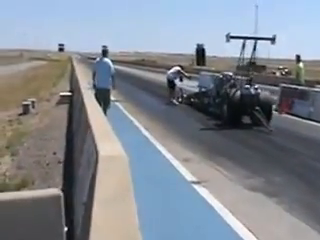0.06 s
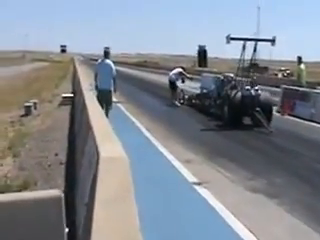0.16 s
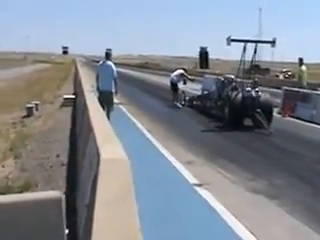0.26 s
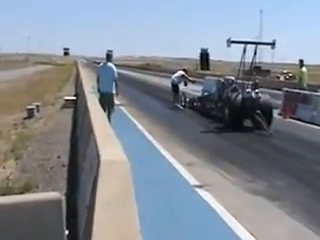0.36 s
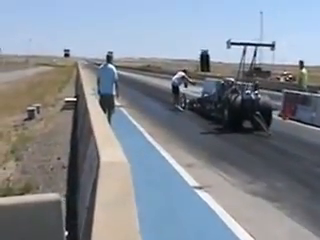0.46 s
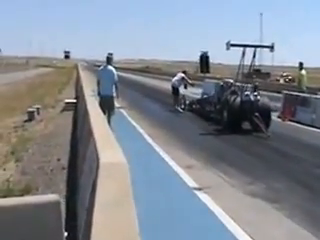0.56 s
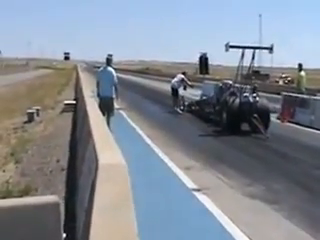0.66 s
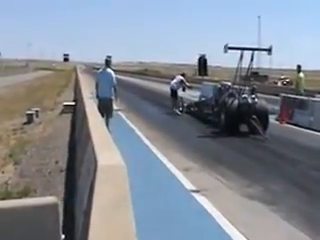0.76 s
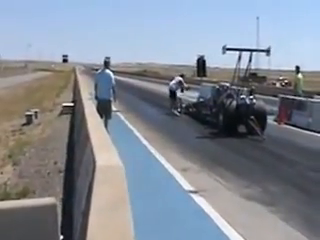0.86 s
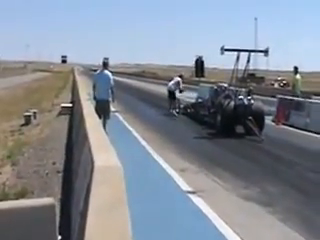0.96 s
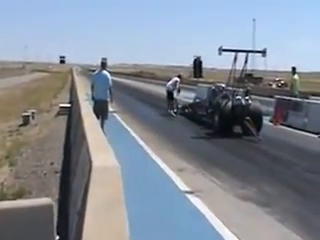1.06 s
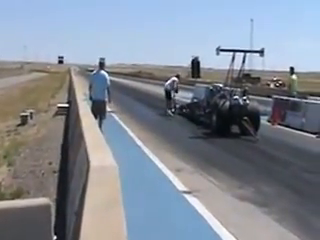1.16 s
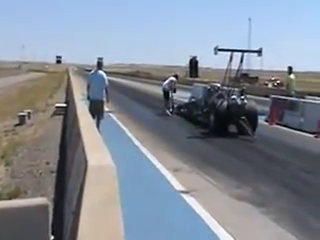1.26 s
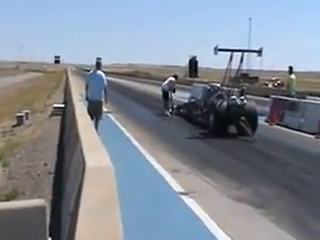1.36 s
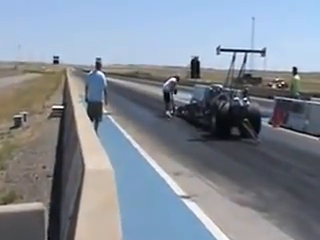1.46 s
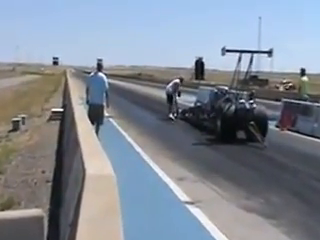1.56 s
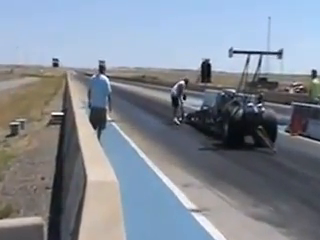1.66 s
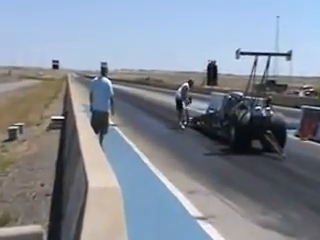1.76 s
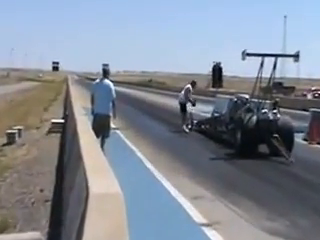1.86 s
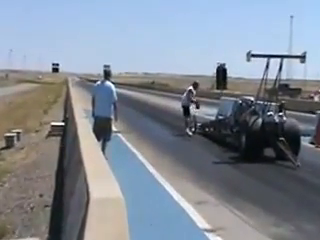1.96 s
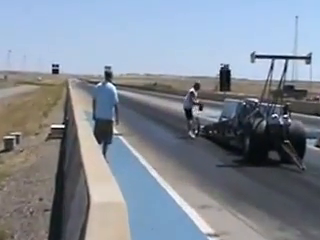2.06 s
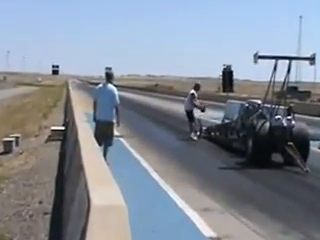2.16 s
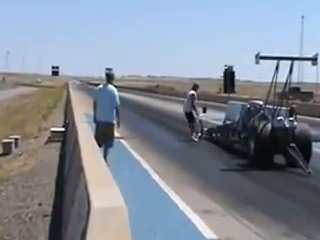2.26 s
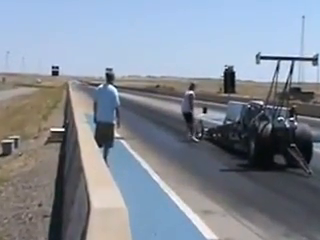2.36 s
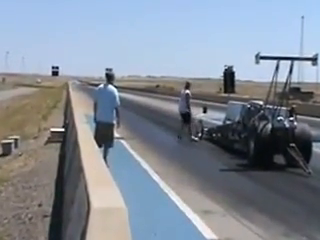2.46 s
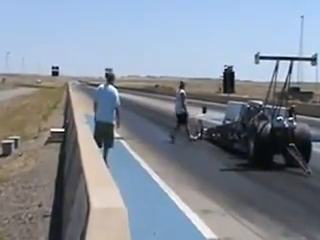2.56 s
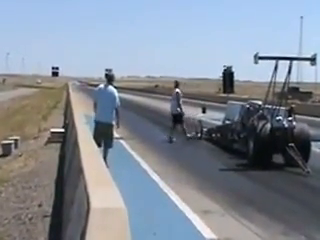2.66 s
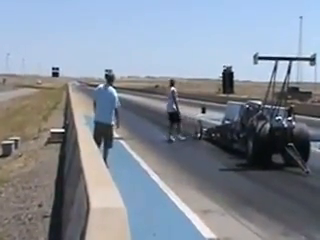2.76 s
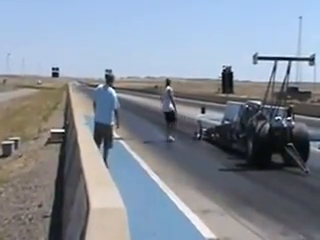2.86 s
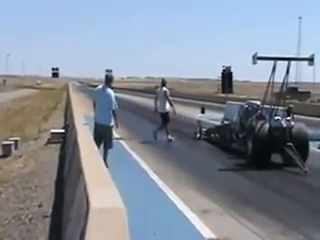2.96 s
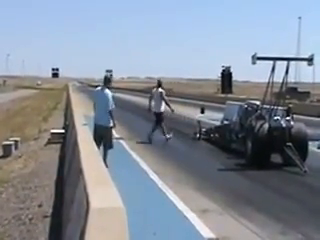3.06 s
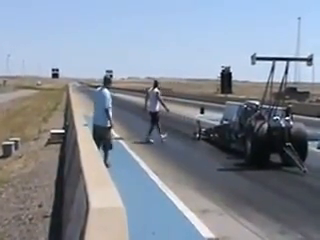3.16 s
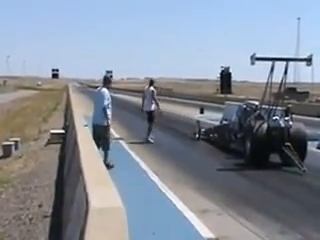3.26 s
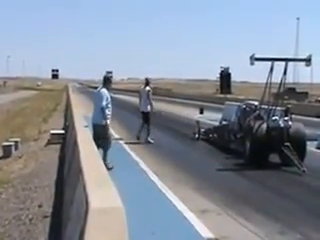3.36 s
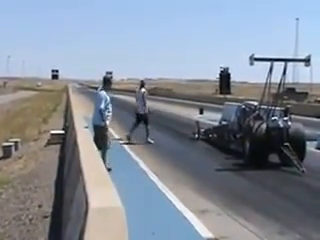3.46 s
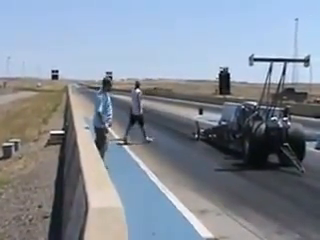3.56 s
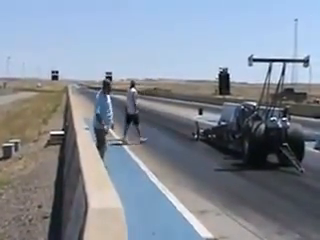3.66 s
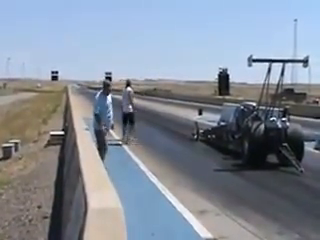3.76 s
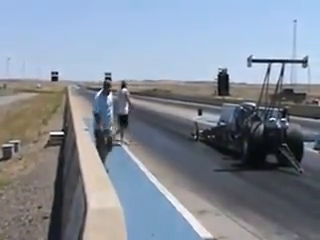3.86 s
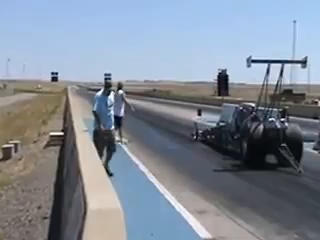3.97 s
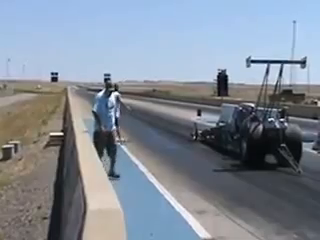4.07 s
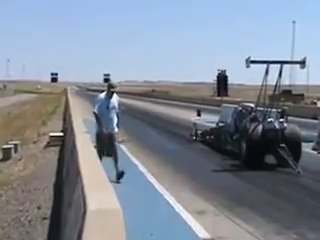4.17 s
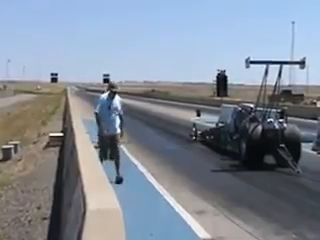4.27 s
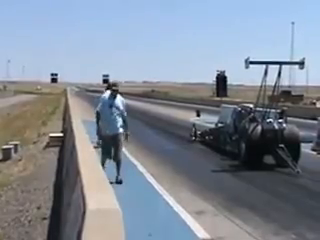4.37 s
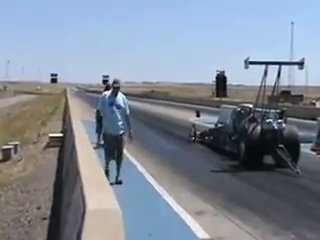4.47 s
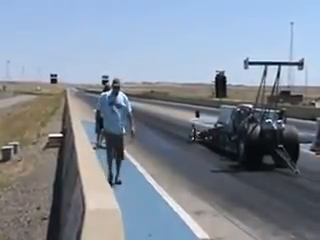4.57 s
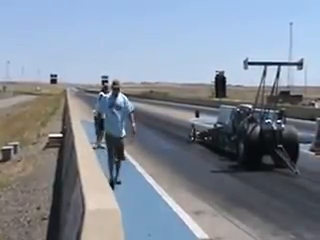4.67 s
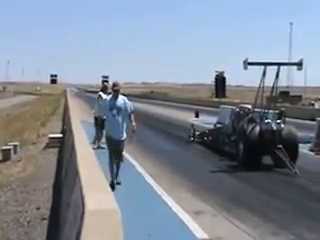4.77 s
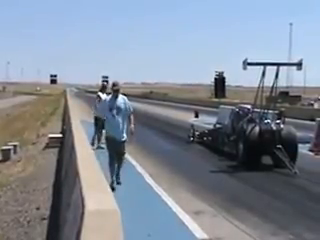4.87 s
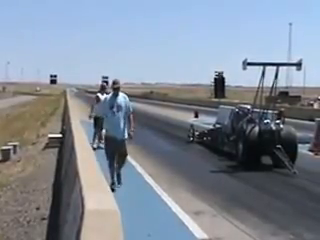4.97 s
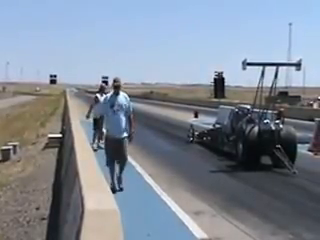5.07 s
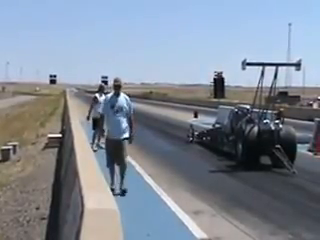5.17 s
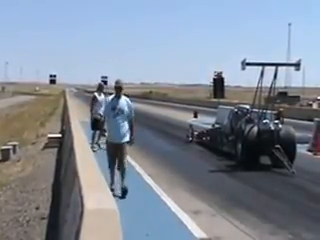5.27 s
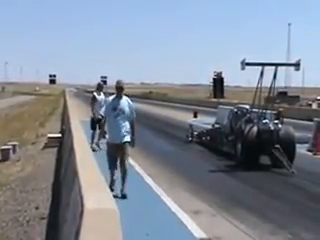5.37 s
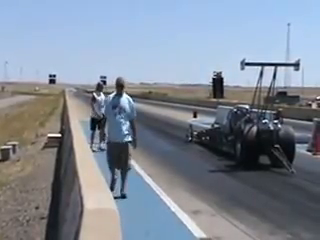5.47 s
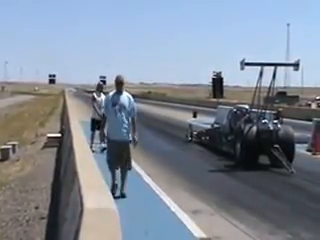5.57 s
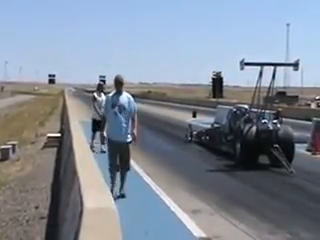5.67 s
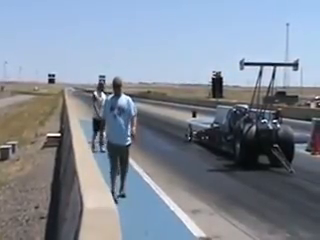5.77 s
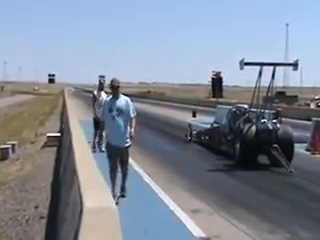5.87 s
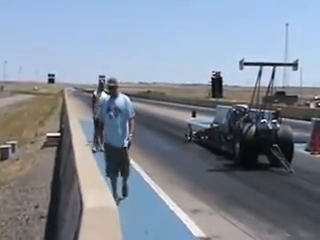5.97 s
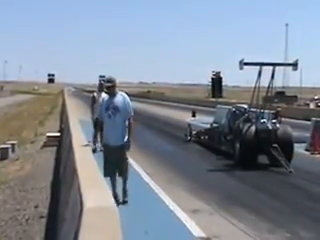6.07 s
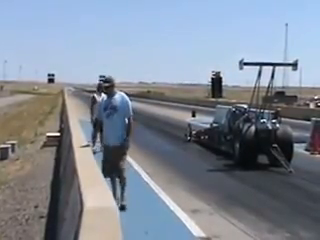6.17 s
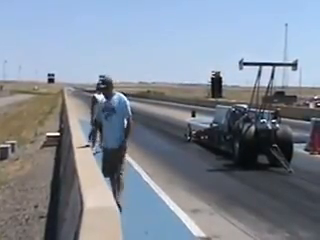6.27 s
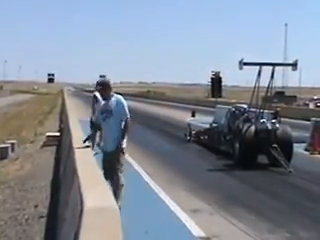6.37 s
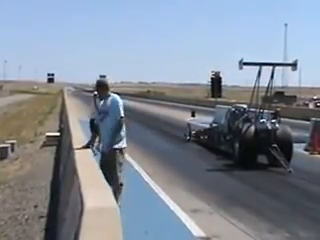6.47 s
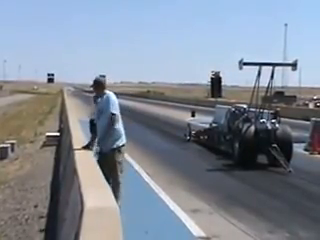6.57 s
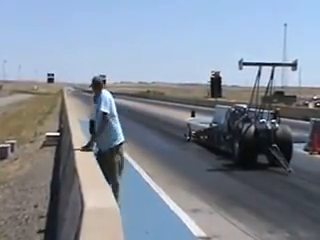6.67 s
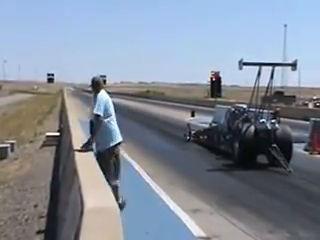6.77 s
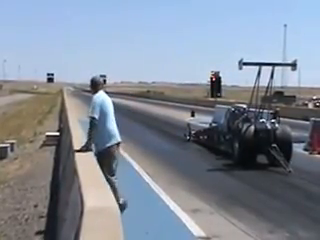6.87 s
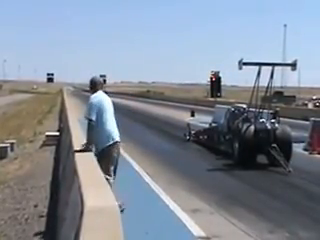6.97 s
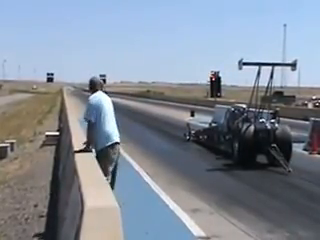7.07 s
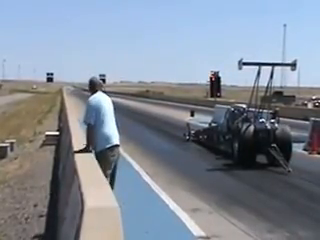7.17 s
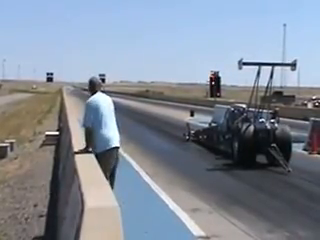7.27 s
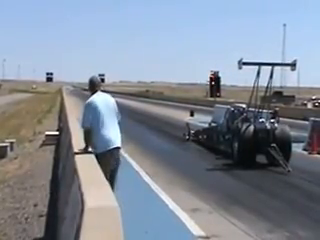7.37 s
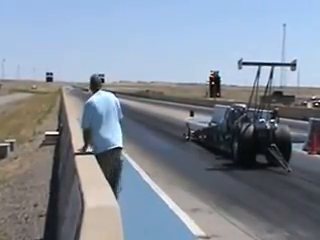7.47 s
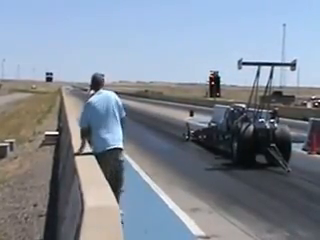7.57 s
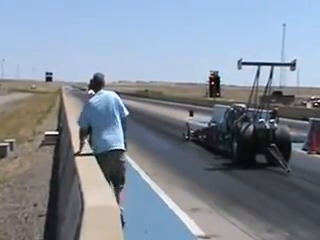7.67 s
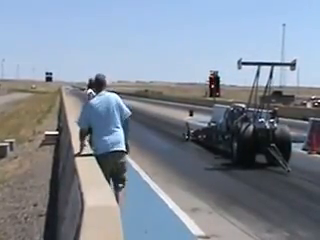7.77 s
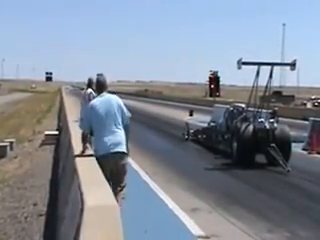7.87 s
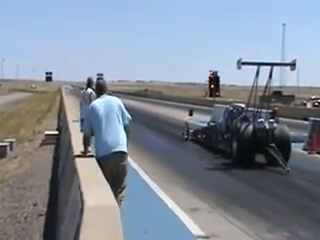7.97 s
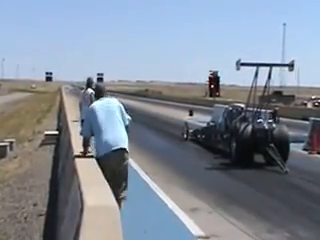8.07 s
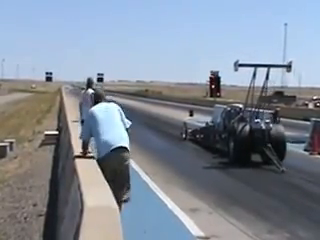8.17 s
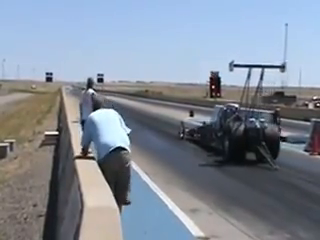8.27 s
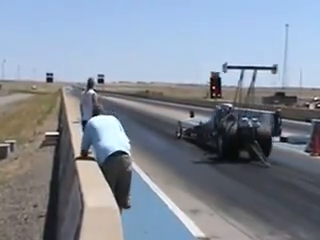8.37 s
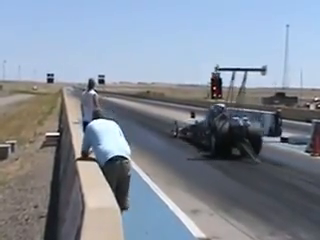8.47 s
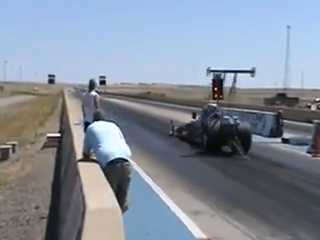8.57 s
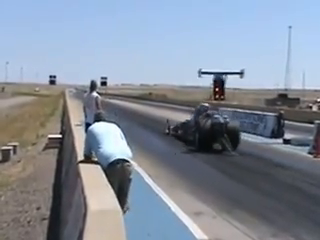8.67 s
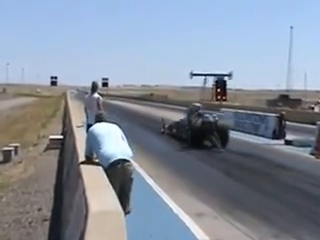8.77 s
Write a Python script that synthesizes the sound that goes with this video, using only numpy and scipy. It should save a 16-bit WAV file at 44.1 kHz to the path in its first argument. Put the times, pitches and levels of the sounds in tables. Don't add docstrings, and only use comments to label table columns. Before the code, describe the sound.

From 0 s a supercharged eight-cylinder race engine with open pipes idles loudly a few metres to the right, outdoors beside a concrete wall and strip. The beat is fast, lumpy and lopsided, about thirteen to fourteen cycles a second, slightly quicker until about 2 s, then steady. Each firing combines a deep thump near 120-185 Hz, a hollow bark and a dry, bright crack, with a short slap off wall and ground. Low unsteady rumble and pulsing blower hiss fill the gaps. It briefly stumbles at moments, more often from 4 to 7 s, with harder pops near 3.5 and 6.8 s. At about 8 s the throttle snaps open: revs flare within a third of a second, firings fuse into a dense, buzzing drone with tearing jet roar. The pitch keeps climbing to the end near 9 s, clipped and compressed, beginning to drop back as the car leaves.

```python
import sys
import numpy as np
from scipy import signal
from scipy.fft import rfft, irfft, next_fast_len
from scipy.io import wavfile
from scipy.ndimage import uniform_filter1d, map_coordinates

SR = 44100
rng = np.random.default_rng(int(sys.argv[2]) if len(sys.argv) > 2 else 0)


def ratio_of_db(decibels):
    return 10 ** (np.asarray(decibels, float) / 20)


def master_out(mix):
    frames = np.transpose(np.atleast_2d(mix))
    ceiling = np.clip(frames, -1, 1)
    pcm = np.round(ceiling * 32767).astype(np.int16)
    wavfile.write(sys.argv[1], SR, pcm)


N = 388521
FIRINGS = 8

# frequency in Hz, level in dB per Hz.
MOUTH_COLOUR = [(600, -45), (900, -16), (1120, -9), (1700, -8), (2350, -5.5), (2690, -3.5), (3180, -7),
                (5190, -8), (6560, -8.5), (9620, -10), (10400, -14)]


def unit(x):
    return x / np.sqrt(np.mean(x ** 2) + 1e-20)


def along(points, hz):
    f, v = np.transpose(points)
    return np.interp(np.log(hz + 1), np.log(f + 1), v)


def wobble(rate):
    return map_coordinates(rng.standard_normal(int(N * rate / SR) + 4), [np.arange(N) * rate / SR])


def filtered(x, response):
    m = next_fast_len(N + SR // 2)
    return irfft(rfft(x, m) * response(np.fft.rfftfreq(m, 1 / SR)), m)[..., :N]


def coloured(x, spectrum):
    return unit(filtered(x, lambda hz: ratio_of_db(along(spectrum, hz))))


def noise(spectrum):
    return coloured(rng.standard_normal((2, N)), spectrum)


def above(x, corner_hz):
    return filtered(x, lambda hz: 1 / (1 + (corner_hz / (hz + 1)) ** 4))


def laid(seconds, rows):
    at = np.round(seconds * SR).astype(int)[:, None] + np.arange(rows.shape[1])
    return np.bincount(np.clip(at, 0, N).ravel(), rows.ravel(), N + 1)[:N]


def switch(at_s, width_s):
    return (1 + np.tanh((np.arange(N) / SR - at_s) / (2 * width_s))) / 2


def throttle():
    return switch(at_s=8.05, width_s=0.02)


def level(idle_db, open_db, leaving_db_per_s):
    leaving_s = np.maximum(np.arange(N) / SR - 8.15, 0)
    return idle_db + (open_db - idle_db) * throttle() + leaving_db_per_s * leaving_s


def crank():
    # thump size, thump lag in ms, bark level in dB,
    # crack level in dB, crack lag in ms.
    cylinders = np.array([(.13, -.43, -1, -3.5, 1.9), (2.19, .1, -8, -12, 3.4), (.9, -1.03, 0, -1, 1.9),
                          (2.59, -.53, 0, 0, 2.2), (1.98, .32, -16, -9, .3), (1.59, -.72, -8, -11, 3.2),
                          (2.6, .26, -4, -7, 4), (1.71, .43, -7, -6, .6)])
    # time in seconds, lag in cycles.
    stumbles = [(.532, .082), (2.342, .065), (2.886, .098), (3.177, .03), (4.325, -.042), (4.621, .049),
                (5.08, .029), (5.403, .035), (5.853, .051), (6.333, .058), (6.792, .077)]
    stumble_s = .115
    clock = np.arange(N) / SR

    warm_hz, steady_hz = 13.985, 13.5105
    speed = warm_hz + (steady_hz - warm_hz) * switch(at_s=1.938, width_s=.374)
    flare_at_s, climb_at_s, flare_hz = 7.97, 8.262, 25
    speed += np.interp(clock, [flare_at_s, climb_at_s], [0, flare_hz])
    speed += 28 * np.maximum(clock - climb_at_s, 0) ** 2
    speed = uniform_filter1d(speed, size=2001)

    lag = sum(cycles * np.exp(-((clock - s) / stumble_s) ** 2) for s, cycles in stumbles)
    angle = -.0575 + np.cumsum(speed) / SR - lag
    load = np.clip((speed - 14.6) / 17, 0, 1)

    count = np.arange(np.ceil(angle[0] * FIRINGS), angle[-1] * FIRINGS).astype(int)
    when = np.interp(count / FIRINGS, angle, clock)
    weight = np.interp(when, clock, (speed / speed.min()) ** -.5)
    return angle, load, when, cylinders[count % FIRINGS].T, weight


def charge(when, cylinder):
    # time in seconds, peak level in dB.
    rich_shots = [(0.1025, -12.6), (1.4658, -13.0), (1.5274, -13.1), (1.6086, -13.1), (1.7545, -13.2),
                  (2.1186, -12.3), (2.3406, -13.0), (3.0036, -12.4), (3.0672, -12.9), (3.343, -12.7),
                  (3.3616, -13.2), (3.4438, -11.3), (3.5189, -13.1), (3.5831, -11.5), (3.5939, -11.6),
                  (4.1112, -13.0), (4.2472, -12.6), (4.4044, -12.6), (4.5471, -12.4), (4.5576, -13.1),
                  (4.6215, -12.9), (4.8405, -13.2), (4.9147, -12.9), (5.4345, -12.7), (6.5506, -13.1),
                  (6.7708, -10.7), (6.8529, -13.3), (7.56, -13.0), (7.589, -12.5), (7.6631, -11.9)]
    db = np.minimum(2.1 * rng.standard_normal(len(when)), 2.5)
    for s, peak_db in rich_shots:
        k = np.argmin(abs(when + cylinder[4] / 1000 - s))
        db[k] = peak_db + 14 - cylinder[3, k]
    return db


def rumble(load):
    # frequency in Hz, level in dB per Hz.
    scattered = [(13, -58), (22, -19), (53, -10.5), (78, -8), (95, -1), (139, -8.5), (180, -5.5), (236, 1),
                 (517, -15), (766, -12.5), (878, -19), (1110, -26.5), (1300, -26), (1690, -25),
                 (2860, -120)]
    return ratio_of_db(-4 + 14 * load * (1 - load) + 2.04 * wobble(10)) * noise(scattered)


def thump(when, cylinder, weight, scatter_db, jitter_ms):
    # frequency in Hz, width in Hz, level in dB.
    resonances = [(119.8, 26, 0), (185.4, 15, -.4), (234, 15, -5.5), (305, 60, -19)]
    chance = rng.standard_normal((len(when), 2))
    size = weight * cylinder[0] * ratio_of_db(scatter_db * chance[:, 0])
    lag_ms = cylinder[1] - .43 + jitter_ms * chance[:, 1]
    pushes = laid(when + lag_ms / 1000, size[:, None])

    def pipe(f):
        soft = (1j * f / (200 + 1j * f)) ** 2 / (1 + (f / 400) ** 6)
        ring = 0
        for k, (centre, width, db) in enumerate(resonances):
            sign = -1 if k > 0 else 1
            ring = ring + sign * ratio_of_db(db) * 1j * f * width / (centre ** 2 - f ** 2 + 1j * f * width)
        return ring * soft

    return unit(filtered(-pushes, pipe))


def bark(when, cylinder, size, pipe_hz, swell_s):
    # frequency in Hz, level in dB.
    upper_pipe = [(300, -48), (520, 0), (620, -1.5), (780, -0.5), (930, -3.5), (1080, -9.5), (1500, -49)]
    t = np.arange(SR // 40) / SR
    pair = []
    for _ in range(2):
        chance = rng.standard_normal((len(when), 3))
        pitch = pipe_hz * np.exp(.12 * chance[:, :1])
        ring = np.sin(2 * np.pi * pitch * t) * (t / swell_s) ** 2 * np.exp(-t / swell_s)
        start = when + (cylinder[4] + 0.23 * chance[:, 1]) / 1000 - 2 * swell_s
        strength = size * ratio_of_db(1.5 * chance[:, 2])
        pair.append(laid(start, ring * strength[:, None]))
    return coloured(np.array(pair), upper_pipe)


def crack(when, cylinder, size, colour_db, swell_s):
    t = np.arange(1024) / SR - .004
    slap = ratio_of_db(-10 - 60 * np.maximum(t, 0) / .05) / (1 + np.exp(-t / .001))
    core = np.exp(-abs(t) / swell_s)
    tint = uniform_filter1d(rng.standard_normal((len(when), len(t) // 2 + 1)), size=30, axis=1)
    colour = ratio_of_db(colour_db * unit(tint))
    start = when + (cylinder[4] + .3 * rng.standard_normal(len(when))) / 1000 + t[0]
    pair = []
    for _ in range(2):
        gas = irfft(rfft(rng.standard_normal((len(when), len(t)))) * colour)
        strength = size / np.linalg.norm(gas * core, axis=1)
        pair.append(laid(start, strength[:, None] * (core + slap) * gas))
    return coloured(np.array(pair), MOUTH_COLOUR)


def hiss(angle, load, gasp_db):
    air = noise(MOUTH_COLOUR)
    treble = above(air, 4800)
    gasp = np.exp(-((angle % 1 - .7) / .1) ** 2)
    gasp = gasp * np.clip(1 + 0.76 * wobble(12), 0, 2) * (1 - load)
    air = air + (ratio_of_db(1.8 * wobble(22) - gasp_db * gasp) - 1) * treble
    breath_db = 2.2 * (1 - load) * np.cos(4 * np.pi * (angle - .44))
    return ratio_of_db(1.46 * wobble(14) + breath_db) * air


def roar():
    # frequency in Hz, level in dB per Hz.
    jet = [(560, -22), (950, 4), (1400, 2.5), (1700, 3.5), (1990, 2), (6430, -10.5), (9600, -38),
           (10400, -30), (13500, -49), (22000, -120)]
    return ratio_of_db(2.0 * wobble(60)) * throttle() * noise(jet)


def drone(angle, orders, cycle_hz):
    pair = np.zeros((2, N))
    on = slice(round(7.9 * SR), N)
    for k, db in orders:
        spread = min(k * cycle_hz / 600, 1) * np.pi / 4 * np.array([[-1], [1]])
        stagger = 3 * k * k / (2 * FIRINGS)
        phase = 2 * np.pi * (k * angle + stagger + .0055 * k * wobble(36))[on]
        pair[:, on] += ratio_of_db(db + 2.6 * wobble(32)[on]) * np.sin(phase + spread) / np.cos(spread)
    pair[:, on] = unit(pair[:, on])
    return pair * ratio_of_db([[1.8], [-1.8]])


def revving_note(angle, load):
    # multiple of the cycle rate, level in dB.
    revving_orders = [(5, -12), (8, 0), (11, -6), (13, -1), (16, -7), (19, -8), (21, -8)]
    return ratio_of_db(-2.0) * 4 * load * (1 - load) * above(drone(angle, revving_orders, cycle_hz=22), 140)


def full_load_note(angle, load):
    # multiple of the cycle rate, level in dB.
    full_orders = [(1, -16), (2, -8), (3, -2), (4, -13), (5, 0), (6, -3), (7, -8), (8, -4), (9, -5),
                   (10, -13), (11, -8), (12, -18), (13, -6), (14, -9), (15, -10), (16, -4), (17, -4),
                   (18, -6), (19, -8), (20, -12), (21, -11), (22, -14), (23, -14), (24, -12), (25, -16),
                   (26, -18)]
    return ratio_of_db(2.5) * load ** 2 * drone(angle, full_orders, cycle_hz=42)


def ports(pair):
    # frequency in Hz, left-right likeness from 0 to 1.
    likeness = [(30, .3), (80, .93), (180, .94), (350, .72), (700, .78), (1400, .3), (2800, .6),
                (5600, .65), (10000, .63)]
    # frequency in Hz, left minus right in dB.
    tilt = [(60, 3.5), (110, 3.0), (190, 3.0), (330, 2.5), (580, -1.5), (1030, -1.5), (1820, -1.8),
            (3210, -1.0), (5670, 0.0), (10000, 0.5)]
    # frequency in Hz, lead of the left in radians.
    lead = [(70, -.6), (260, -1.4), (520, -1.8), (1030, -1.0), (1380, -1.1), (2070, -0.5), (3010, -0.3),
            (3270, -0.5), (5000, -0.5), (5340, -0.8), (6800, -0.8), (10200, -1.2)]

    def shares(hz):
        turn = np.arccos(np.clip(along(likeness, hz), -1, 1)) / 2
        return np.array([np.cos(turn), np.sin(turn)])

    def sides(hz):
        half = ratio_of_db(along(tilt, hz) / 2) * np.exp(.5j * along(lead, hz))
        return np.array([half, 1 / half])

    mid, side = filtered(pair, shares)
    return filtered(np.array([mid + side, mid - side]), sides)


def scene():
    angle, load, when, cylinder, weight = crank()
    thump_db = level(idle_db=-15, open_db=-13, leaving_db_per_s=-2.5)
    bark_db = level(idle_db=-24, open_db=-11, leaving_db_per_s=-8.5)
    crack_db = level(idle_db=-26, open_db=-17, leaving_db_per_s=-2)
    uneven = 1 - .5 * np.interp(when * SR, np.arange(N), load)
    shot_db = charge(when, cylinder)
    bark_size = weight * ratio_of_db(uneven * cylinder[2] + .5 * shot_db)
    crack_size = weight * ratio_of_db(uneven * cylinder[3] + shot_db)
    noisy = 1 - .55 * load

    pair = ratio_of_db(thump_db) * noisy * rumble(load)
    thumps = thump(when, cylinder, weight, scatter_db=1.5, jitter_ms=.2)
    pair[0] += ratio_of_db(thump_db) * (1 - load ** 2) * thumps
    pair += ratio_of_db(bark_db) * noisy * bark(when, cylinder, bark_size, pipe_hz=794, swell_s=0.001078)
    cracks = crack(when, cylinder, crack_size, colour_db=3.0, swell_s=0.0013)
    pair += ratio_of_db(crack_db + 0.5) * (1 - 0.068 * load) * cracks
    pair += ratio_of_db(crack_db - 3) * hiss(angle, load, gasp_db=7)
    pair += ratio_of_db(crack_db + 0.5) * roar()

    note = revving_note(angle, load) + full_load_note(angle, load)
    return ports(pair) + ratio_of_db(thump_db) * note


def roll_off(x):
    return signal.sosfilt(signal.butter(12, 10610, fs=SR, output="sos"), x)


def record(dry):
    x = dry / (1 + abs(dry / 1.1) ** 4) ** .25
    x = filtered(x, lambda hz: 1 / (1 + (hz / 10450) ** 160))
    mix = np.clip(x, -1, 1)
    return roll_off(mix)


dry = scene()
out = record(dry)
master_out(out)
```